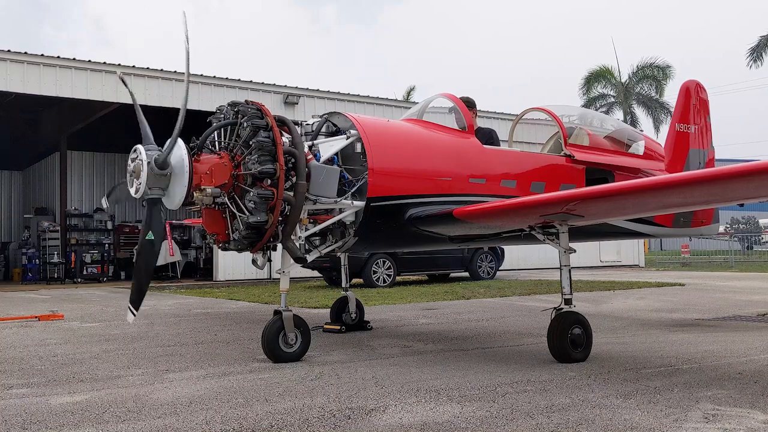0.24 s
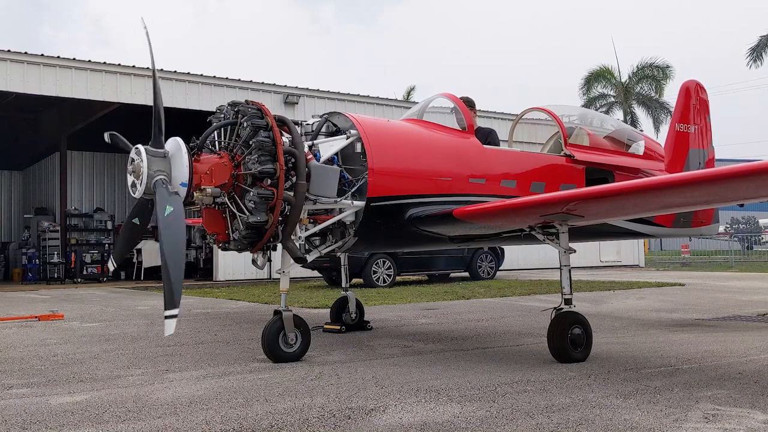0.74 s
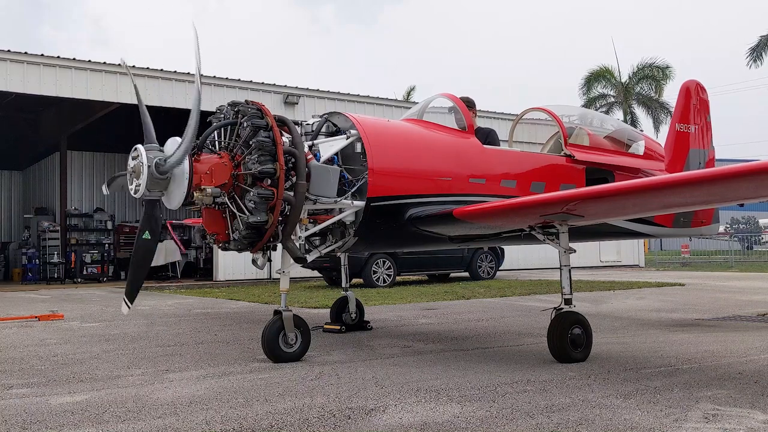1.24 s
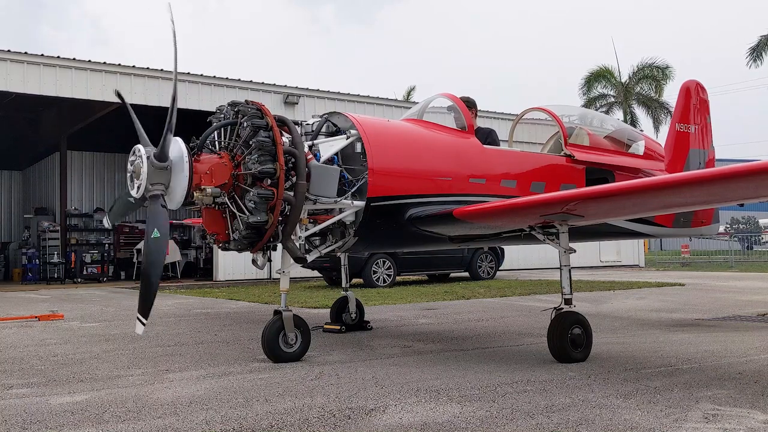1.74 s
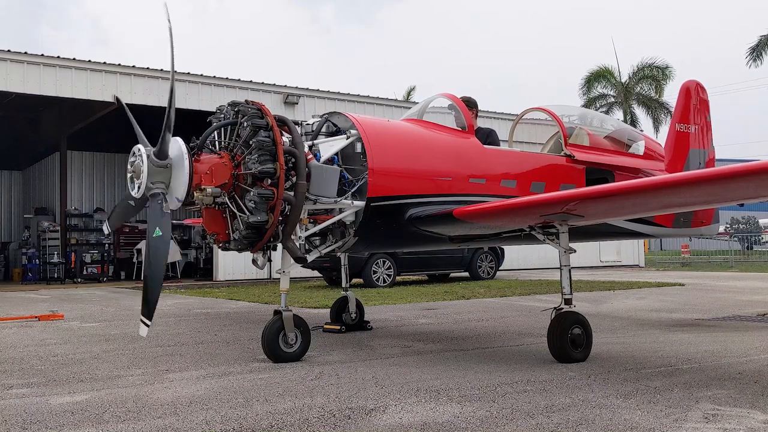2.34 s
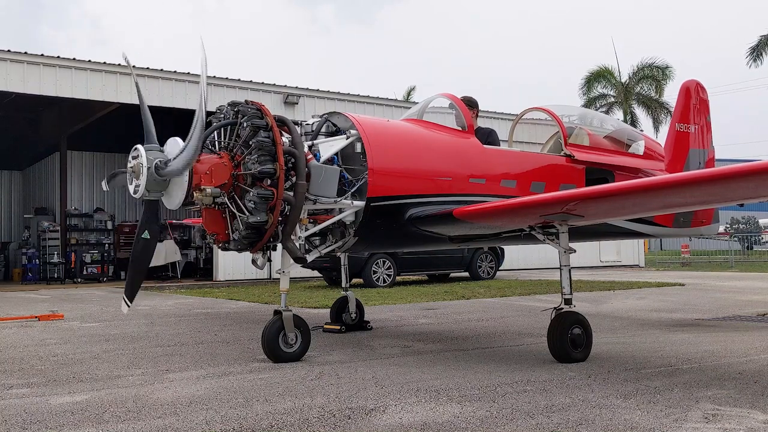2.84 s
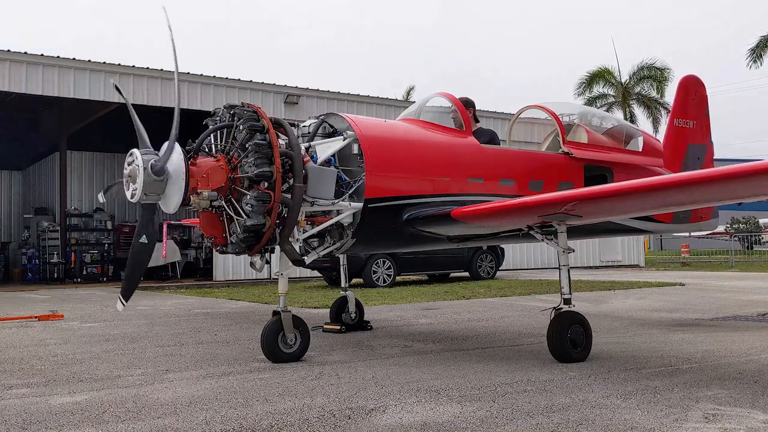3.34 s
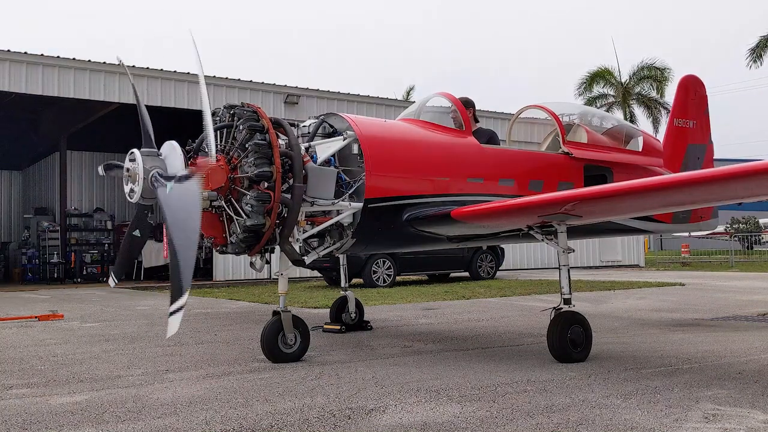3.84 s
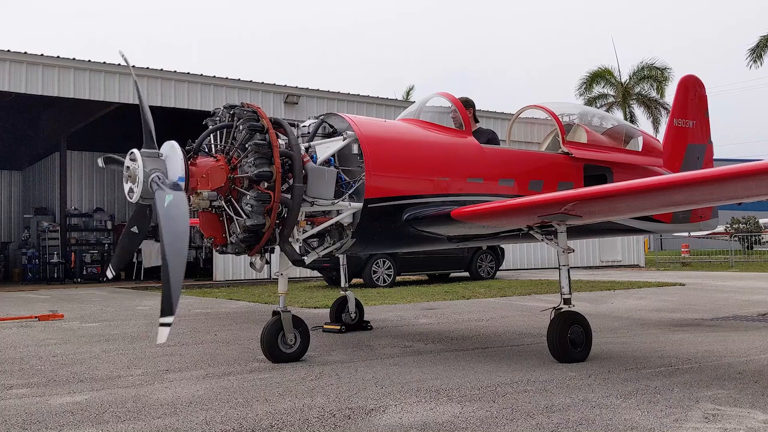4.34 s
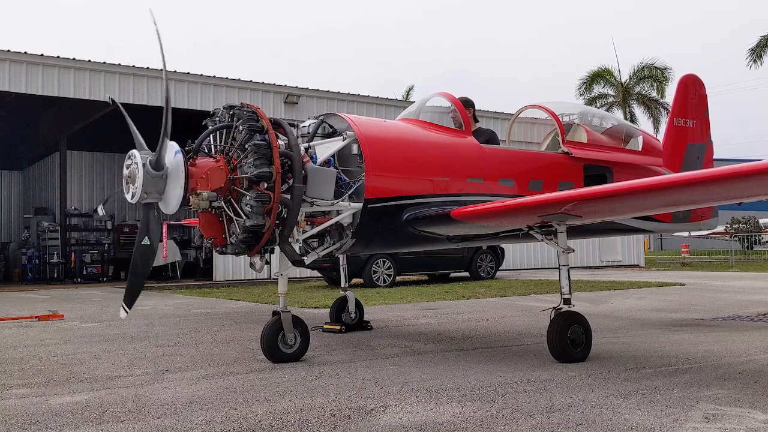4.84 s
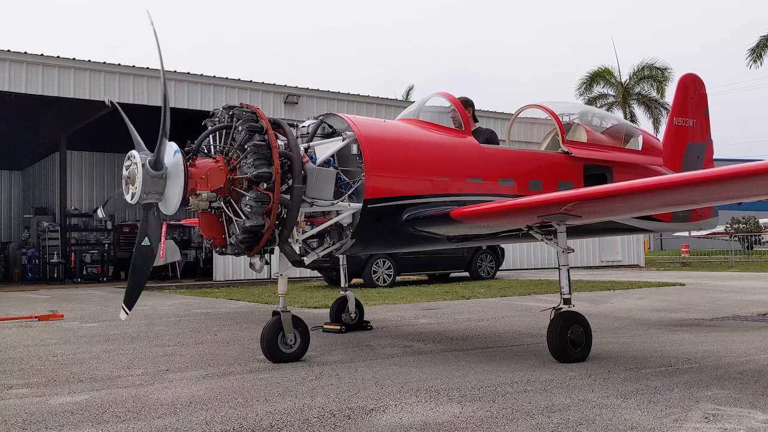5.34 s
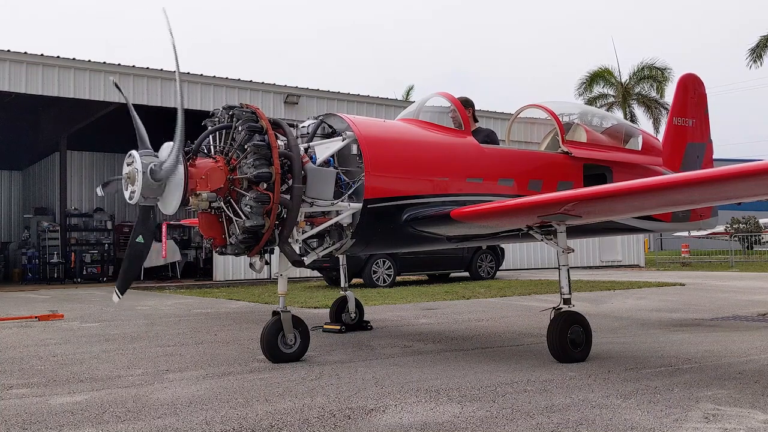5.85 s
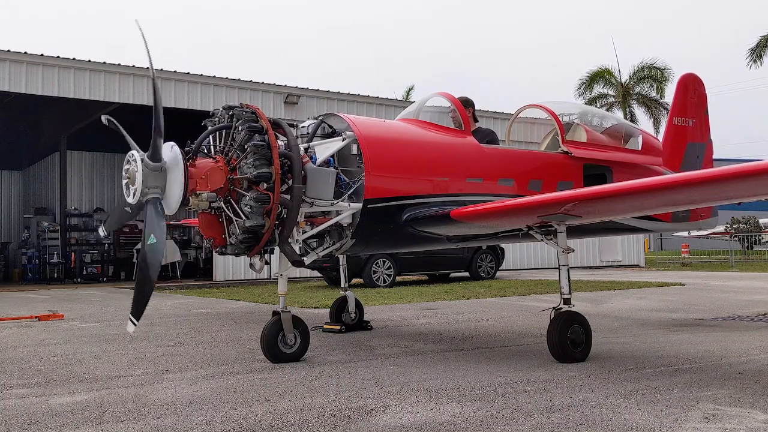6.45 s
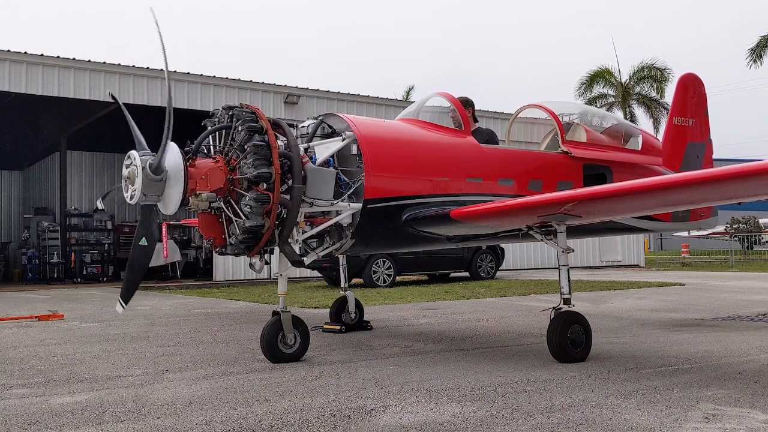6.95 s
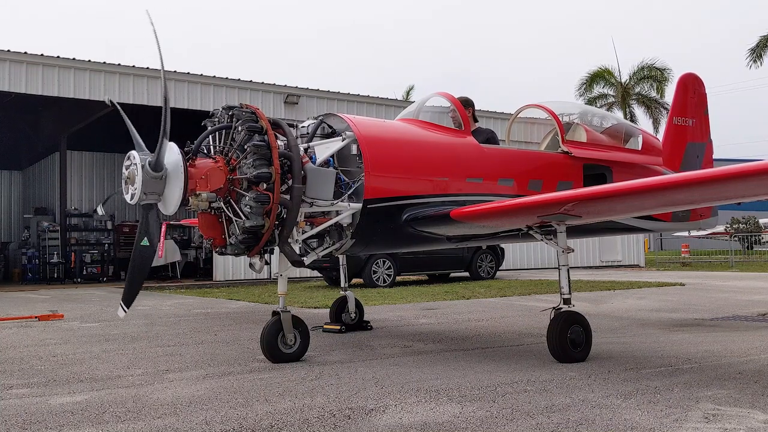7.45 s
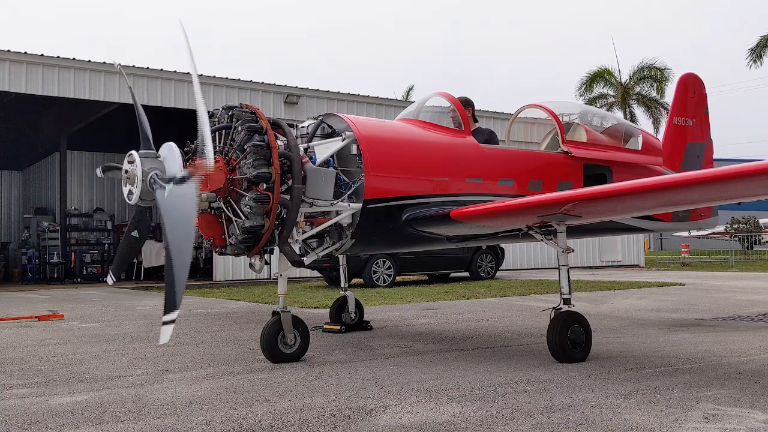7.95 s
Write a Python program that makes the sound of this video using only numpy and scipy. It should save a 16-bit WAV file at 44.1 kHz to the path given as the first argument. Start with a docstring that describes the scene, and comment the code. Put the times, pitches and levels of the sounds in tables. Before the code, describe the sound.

Close outdoor stereo sound of a nine-cylinder aircraft engine. First comes a loping idle, each firing separate and irregular, with low thumps, gulping exhaust, short barks and bright metallic chuffs; some chuffs nearly fail. Faint very high whistles hover above. After three seconds the pulses suddenly fuse into a fast, throbbing drone with broad propeller rush and fine clatter, its speed rising slightly. Three isolated clicks occur later, the last two much louder.

```python
"""An uneven, loping idle is heard first: thumps, gulps and hissing chuffs beneath thin whistles. After three
seconds the scene changes to a steady throbbing run nearly three times as fast, with three brief clicks. The
source is a nine-cylinder radial aircraft engine, uncowled on an open ramp. Puffs with each cylinder's own
timing and strength excite exhaust modes; gated turbulence gives the chuffs and rush; ringing modes give the
gulps, barks and metallic ticks; narrow-band noise gives the whistles; decaying jumps give the clicks."""
import sys
import numpy as np
from scipy import signal
from scipy.fft import rfft, irfft, next_fast_len
from scipy.io import wavfile
from scipy.ndimage import map_coordinates

SR = 44100
rng = np.random.default_rng(int(sys.argv[2]) if len(sys.argv) > 2 else 0)


def inscribe(sig):
    """Save sig as 16-bit PCM at rate SR to the path in sys.argv[1].

    A 1-D sig is mono; a 2-D sig holds one channel per row.
    Samples are clipped to [-1, 1] before scaling.
    """
    pcm = np.round(np.clip(np.atleast_2d(sig).T, -1, 1) * 32767)
    wavfile.write(sys.argv[1], SR, pcm.astype(np.int16))


N = 361179
TIME = np.arange(N) / SR
CHANGE_S = 2.985  # the scene changes from the idle to the run
PICKUP_RPM, SETTLED_RPM = 1545, 1650
CHUFF_SCATTER_DB, MISS_DB = 2, -14
RUN_PUFF_HZ = 263.4  # each puff is too rounded to hold much above this
EARLY_BARK_DB, SETTLED_BARK_DB = -2.5, 0.8  # the barks grow as the engine settles
TOP_HZ = 16000  # upper band limit

# "Place" is the position in ninths of the two-turn engine cycle.
# Crankshaft speed: [t/s, speed/rpm]
IDLE_SPEED = [(0.0, 580.0), (0.5, 584.3), (1.1, 585.8), (1.7, 560.2), (2.0, 583.1), (2.4, 555.5),
              (2.98, 576.0)]
RUN_SPEED = [(3.0, 1533.1), (3.6, 1548.2), (4.3, 1603.5), (4.6, 1598.8), (4.9, 1633.2), (5.3, 1642.4),
             (5.6, 1633.2), (5.9, 1659.8), (6.3, 1655.6), (6.6, 1652.5), (6.9, 1676.1), (8.19, 1712.8)]
# One row per cylinder at idle: [thump place, level/dB, gulp place, level/dB, bark place, level/dB]
IDLE_CYLINDERS = [(1.28, 5, 0.696, -19, 0.099, -24.5), (1.92, -20, 1.93, -24, 0.96, -26.5),
                  (2.8, 5, 2.68, -21.5, 1.77, -27.5), (3.71, 3, 3.4, -20, 2.87, -29.5),
                  (4.87, -5.5, 4.03, -22, 3.56, -30.5), (5.73, 1.8, 5.1, -18.5, 5.3, -27.5),
                  (6.91, 0, 5.8, -17.5, 5.67, -36), (7.77, 2.1, 6.95, -38, 6.58, -30.5),
                  (8.34, -1, 7.63, -18.5, 7.63, -32.5)]
# Pitches of each cylinder's exhaust stub at idle, in firing order: [gulp f/Hz, bark f/Hz]
STUB_PITCHES = [(167, 660), (191, 543), (214, 600), (222, 404), (321, 440), (180.6, 560), (235, 382),
                (345, 640), (189, 580)]
# Exhaust modes: [f/Hz, width/Hz, level/dB]
IDLE_PIPE = [(75.8, 18.7, -28)]
PICKUP_PIPE = [(128.5, 86, -26), (130.4, 23, -27), (228, 27, -40)]
SETTLED_PIPE = [(99, 167, -32), (281.4, 37, -33.5), (432, 75, -27.5)]
# Sharp escapes of gas, one pattern per idle cycle: [place, level/dB]
CHUFF_PATTERN = [(.37, -26.5), (0.872, -26), (1.82, -21), (2.88, -28.5), (3.45, -32.5), (3.872, -21),
                 (4.35, -20.5), (5.45, -31), (5.87, -19.5), (6.85, -25), (7.88, -25.5), (8.35, -30.5)]
# Spells in which the chuffs nearly fail: [start t/s, length/s]
MISSES = [(.355, .055), (.56, .06), (1.59, .07), (2.23, .05)]
# Thumps under power: [pick-up place, level/dB, settled place, level/dB]
RUN_CYLINDERS = [(.98, 3.5, 0.923, 5.5), (2.02, -1.2, 2.01, -12.5), (2.59, 3, 2.48, 3.5),
                 (3.65, 3.9, 3.72, 0), (4.85, 1, 4.85, 5), (5.83, -1.8, 5.86, -5.5), (6.63, -9, 6.46, 0.6),
                 (7.69, -0.3, 7.76, -0.2), (8.65, -3, 8.81, -0.1)]
# Barks under power, one per cylinder: [place, level/dB, f/Hz]
RUN_BARKS = [(.2, -41, 455.8), (.48, -39.5, 410.6), (2.24, -39.5, 354.5), (4.35, -49.7, 488),
             (5.32, -34, 265.4), (5.72, -40.5, 390), (5.92, -44.5, 586), (7.42, -51, 429),
             (8.27, -44.5, 357.5)]
# Gas and propeller rush under power: [t/s, level/dB]
RUSH_LEVEL = [(3, -32.5), (3.8, -32), (4.8, -32), (5.7, -31.5), (6.4, -30.5), (7.4, -29.5), (8.19, -30.5)]
# Drift of the exhaust tone between the sides: [t/s, left minus right level/dB]
EXHAUST_LEAN = [(0, 1.8), (2.6, 1.9), (3.8, 1.8), (4.5, 0.7), (6.5, -0.2), (8.19, 0.5)]
# Two whistles heard together at first, a thin one that soon fades and a breathy one that lasts:
# [t/s, f/Hz, level/dB]
THIN_WHISTLE = [(0, 12430, -40), (.84, 12410, -39), (.89, 12390, -50), (1, 12400, -43), (1.15, 12400, -70)]
BREATHY_WHISTLE = [(0, 11650, -42), (1, 11600, -42), (1.25, 11540, -31.5), (1.6, 11260, -43),
                   (2.2, 11190, -45), (2.96, 11170, -41), (3.05, 11200, -53.5), (6.5, 11230, -58),
                   (7.3, 11250, -41), (8.19, 11200, -39)]
# Click instants: [t/s, peak level/dB]
CLICK_TIMES = [(4.584, -16), (5.5866, -3.5), (6.5864, -2)]
# Noise spectra: [f/Hz, level/dB per Hz]
GULP_SPECTRUM = [(90, -52), (135, -1), (220, -2), (330, -8.5), (450, -16), (900, -70)]
IDLE_BARK_SPECTRUM = [(250, 0.5), (420, -5.5), (580, 0.5), (700, -6.5), (850, -12), (1600, -24)]
RUN_BARK_SPECTRUM = [(300, -28), (450, -4.5), (580, 0), (700, -11.5), (900, -13), (1600, -36)]
RUMBLE_SPECTRUM = [(15, -30), (35, -7), (60, 3), (130, -6), (300, -2), (700, -22), (1400, -49)]
CHUFF_SPECTRUM = [(440, -13), (750, -4), (831, -5), (1440, -4.5), (1600, -6.5), (2230, -2), (3110, -5),
                  (3860, -4.5), (5970, -7), (7050, -7), (9470, -7), (10600, -11.5), (11500, -3),
                  (12900, -9), (16000, -17)]
RUSH_SPECTRUM = [(440, -15), (750, -4), (1300, -2.5), (1860, -6), (2340, -4), (3070, -2.5), (3310, -7),
                 (3810, -5), (6360, -9), (9470, -11), (10500, -12), (11500, -6.5), (13500, -10.5),
                 (15200, -16), (16000, -8.5)]
# Cylinder and pipe resonances that colour the gas noise: [f/Hz, width/Hz, level/dB]
METAL_MODES = [(1340, 130, 2.5), (2270, 190, 2.5), (3850, 77, 5), (4650, 580, 2), (7110, 150, 5),
               (9650, 1340, 4)]
# Modes of the ticking metal: [f/Hz, level/dB]
TICK_MODES = [(1330, -7.5), (2280, 2.5), (2600, -4), (3770, -3.5), (4530, 1.5), (7080, 1.5), (9200, 0.5)]
# Stereo coherence: [f/Hz, left-right correlation]
COHERENCE = [(60, 0.28), (640, 1), (1400, 0.9), (3100, 0.62), (6800, 0.15), (15000, 0.15)]
# Stereo balance: [f/Hz, left minus right level/dB]
BALANCE = [(60, 2), (115, 4.5), (210, 2.3), (380, -2), (700, 0), (1290, 4), (2380, 0), (4400, 2.5),
           (8120, 1.5), (12000, 0), (15000, -6.5)]


def amp(db):
    """Logarithmic level: 20 dB is a tenfold change of amplitude."""
    return np.exp(np.log(10) * np.asarray(db) / 20)


def unit(x):
    """Mean-square normalisation: the result has rms 1."""
    return x / np.sqrt(np.mean(x ** 2) + 1e-20)


def along(points, hz):
    """Logarithmic frequency scale: interpolate (f, value) points."""
    f, v = np.transpose(points)
    return np.interp(np.log(hz + 1), np.log(f + 1), v)


def curves(rows):
    """Linear interpolation in time: one curve for each column after t."""
    t, *columns = np.transpose(rows)
    return [np.interp(TIME, t, c) for c in columns]


def wobble(rate):
    """Band-limited random fluctuation: a smooth curve through rate knots a second."""
    fine = np.arange(0, N * rate / SR + 1, .1)
    knots = rng.standard_normal(int(N * rate / SR) + 4)
    return np.interp(TIME * rate, fine, map_coordinates(knots, [fine]))


def filtered(x, gain):
    """Linear filtering: each frequency is multiplied by its own gain."""
    size = next_fast_len(N + SR // 4)
    return irfft(rfft(x, size) * gain(np.fft.rfftfreq(size, 1 / SR)), size)[..., :N]


def air(spectrum, resonances=(), source=None):
    """Partial coherence: coloured stereo noise of rms 1, its sides mixed from common and opposed parts."""
    pair = rng.standard_normal((2, N), dtype=np.float32)
    if source is not None:
        pair[0] = source
    size = next_fast_len(N, True)
    hz = np.geomspace(5, SR / 2, 1500)
    db = along(spectrum, hz)
    db = db + sum(g / (1 + (2 * (hz - f) / w) ** 2) for f, w, g in resonances)
    # this angle gives the wanted left-right correlation
    angle = np.arccos(np.clip(along(COHERENCE, hz), -1, 1)) / 2
    gains = amp(db) * np.cos(angle), amp(db) * np.sin(angle), amp(along(BALANCE, hz) / 2)
    bins = np.fft.rfftfreq(size, 1 / SR)
    common, apart, lean = (np.interp(bins, hz, g).astype(np.float32) for g in gains)
    mid, side = rfft(pair, size) * [common, apart]
    sides = np.array([(mid + side) * lean, (mid - side) / lean])
    return unit(irfft(sides, size)[:, :N])


def cycles(speed, start_s):
    """Four-stroke cycle: count cycles from start_s; every cylinder fires once in two crank turns."""
    turn = np.cumsum(curves(speed)[0]) / SR / 120  # rpm to cycles per second
    return turn - np.interp(start_s, TIME, turn)


def each_cycle(shape, turn):
    """Periodicity: one shape repeats every engine cycle."""
    return np.interp(turn % 1, np.linspace(0, 1, len(shape) + 1), np.append(shape, shape[0]))


def resonance(hz, centre_hz, width_hz):
    """Damped resonance: complex response of one pipe mode, 1 at its centre."""
    return 1j * hz * width_hz / (centre_hz ** 2 - hz ** 2 + 1j * hz * width_hz)


def pipe(resonances, puff_hz, cut_hz):
    """Modal superposition: modes of alternating sign, driven by a rounded puff; little radiates below cut_hz."""
    def response(hz):
        modes = sum((-1) ** k * amp(db) * resonance(hz, f, w) for k, (f, w, db) in enumerate(resonances))
        rounding = np.exp(-(hz / puff_hz) ** 2)
        radiation = 1 - np.exp(-(hz / cut_hz) ** 4)
        return modes * rounding * radiation
    return response


def exhaust_tone(turn, cylinders, response, rpm):
    """Fourier series: nine uneven puffs a cycle set the strength of each harmonic of the exhaust."""
    place, db = cylinders.T
    order = np.arange(100)[:, None]
    puffs = amp(db) * np.exp(-2j * np.pi * order * place / len(place))
    # the response is evaluated at one representative speed
    harmonics = np.sum(puffs * response(order * rpm / 120), axis=1)
    return each_cycle(irfft(harmonics, 2048) * 1024, turn)


def placed(tone):
    """Interaural level difference: the bass of the exhaust lies to the left."""
    sides = [.5, -.5]
    drifting = tone * amp(np.outer(sides, curves(EXHAUST_LEAN)[0]))
    return filtered(drifting, lambda hz: amp(np.outer(sides, along(BALANCE, hz))))


def stub_rings(turn, cylinders, pitches, t60_s, detune, scatter_db):
    """Free decay: each firing sets its own exhaust stub ringing briefly, to the end of the idle."""
    place, db = cylinders.T
    t = np.arange(SR // 12) / SR
    fade = amp(-60 * t / t60_s) * (1 - np.exp(-t / .001))
    out = np.zeros(N + len(t))
    for cycle in range(int(np.interp(CHANGE_S, TIME, turn)) + 1):
        firing_s = np.interp(cycle + place / len(place), turn, TIME)
        for s, level, hz in zip(firing_s, db, pitches):
            size = amp(level + scatter_db * rng.normal())
            pitch = hz * np.exp(detune * rng.normal())
            out[round(s * SR):][:len(t)] += size * fade * np.sin(2 * np.pi * pitch * t)
    return out[:N]


def bursts(times, db, rise_s, fall_s):
    """Addition of incoherent powers: envelope of gas bursts that swell and die exponentially."""
    t = np.arange(-(SR // 8), SR // 8 + 1) / SR
    shape = np.exp(-np.abs(t) / np.where(t < 0, rise_s, fall_s))  # of power
    places = np.clip(times * SR, 0, N).astype(int)
    peaks = np.bincount(places, amp(db) ** 2, N + 1)[:N]
    peaks[0] = 0  # drops bursts from before the start
    return np.sqrt(np.abs(signal.oaconvolve(peaks, shape, "same")))


def blowdown(turn, cylinders, spectrum, repeat, rise_s, fall_s, scatter_db):
    """Turbulent discharge: each opening valve lets out a noise burst, partly the same every cycle."""
    place, db = cylinders.T
    firing = np.arange(np.floor(turn[0]), turn[-1])[:, None] + place / len(place)
    sizes = db + scatter_db * rng.standard_normal(firing.shape)
    gate = bursts(np.interp(firing.ravel(), turn, TIME), sizes.ravel(), rise_s, fall_s)
    habit = unit(each_cycle(rng.standard_normal(int(N / (turn[-1] - turn[0]))), turn))
    share = np.clip(repeat, 0, 1)  # repeated part of the common source's power
    source = np.sqrt(share) * habit + np.sqrt(1 - share) * rng.standard_normal(N)
    return gate * air(spectrum, source=source)


def chuffs(turn):
    """Cyclic gas release: times and levels of one pattern a cycle, a little uneven, with a few misses."""
    place, db = np.transpose(CHUFF_PATTERN)
    firing = np.arange(np.interp(CHANGE_S, TIME, turn))[:, None] + place / len(IDLE_CYLINDERS)
    times = np.interp(firing, turn, TIME)
    missed = sum((times > s) & (times < s + length) for s, length in MISSES)
    levels = db + CHUFF_SCATTER_DB * rng.standard_normal(firing.shape) + MISS_DB * missed
    return times.ravel(), levels.ravel()


def ticks(times, db, t60_s, detune, scatter_db):
    """Impact excitation: each contact of valve gear or pipes rings metal modes at new pitches and strengths."""
    t = np.arange(SR // 40) / SR
    hz, mode_db = np.transpose(TICK_MODES)
    fade = amp(-60 * t / t60_s) * (1 - np.exp(-t / .0004))
    out = np.zeros((2, N + len(t)))
    for s, level in zip(times, db):
        pitch = hz * np.exp(detune * rng.standard_normal(len(hz)))
        size = amp(level + mode_db + scatter_db * rng.uniform(-1.35, 1, len(hz)))
        ear_phase = rng.standard_normal((2, len(hz), 1))
        modes = np.sin((ear_phase + 2 * np.pi * np.outer(pitch, t)).astype(np.float32))
        start = round(max(s, 0) * SR)
        out[:, start:start + len(t)] += size @ modes * fade
    return out[:, :N]


def idle():
    """Separable pulses: at low speed thumps, hollow gulps and barks, and metallic chuffs stand apart."""
    turn = cycles(IDLE_SPEED, 0)
    thumps, gulps, barks = np.split(np.array(IDLE_CYLINDERS), 3, axis=1)
    gulp_hz, bark_hz = np.transpose(STUB_PITCHES)
    rpm = np.mean(IDLE_SPEED, axis=0)[1]
    unsteady = turn + 0.0019 * wobble(25.04)
    tone = exhaust_tone(unsteady, thumps, pipe(IDLE_PIPE, puff_hz=130.5, cut_hz=53), rpm)
    tone = tone * amp(-0.1 + 0.5 * wobble(32.4))
    # gulps and barks are part pipe ring, part turbulence
    gulp = amp(2.5) * stub_rings(turn, gulps, gulp_hz, t60_s=0.068, detune=0.061, scatter_db=1)
    gulp = gulp + amp(-4) * blowdown(turn, gulps, GULP_SPECTRUM, repeat=0.19,
                                     rise_s=0.0032, fall_s=0.014, scatter_db=0.5)
    bark = amp(2.5) * stub_rings(turn, barks, bark_hz, t60_s=0.071, detune=0.072, scatter_db=1.5)
    bark = bark + blowdown(turn, barks, IDLE_BARK_SPECTRUM, repeat=0.22,
                           rise_s=0.0021, fall_s=0.016, scatter_db=0.5)
    times, chuff_db = chuffs(turn)
    # a faint steady hiss lies beneath the chuffs
    gas = np.hypot(bursts(times, chuff_db, rise_s=0.0027, fall_s=0.006), amp(-31))
    hiss = gas * amp(1.32 * wobble(500)) * air(CHUFF_SPECTRUM, METAL_MODES)
    clatter = amp(-3.5) * ticks(times, chuff_db, t60_s=.026, detune=.08, scatter_db=6)
    rumble = amp(-41.5) * air(RUMBLE_SPECTRUM)
    return placed(tone) + gulp + bark + hiss + clatter + rumble


def whistle(rows, width_hz):
    """Narrow-band noise: random quadrature modulation of a drifting pitch, different in each ear."""
    hz, db = curves(rows)
    phase = 2 * np.pi * np.cumsum(hz) / SR
    ears = np.array([wobble(width_hz) * np.cos(phase) + wobble(width_hz) * np.sin(phase) for _ in range(2)])
    return amp(db) * unit(ears) * amp([[-2.5], [2.5]])  # stronger on the right


def running():
    """Pulse fusion: at speed the thumps merge into a drone, with growl, pulsing rush and valve clatter."""
    turn = cycles(RUN_SPEED, 3)
    early, thumps = np.split(np.array(RUN_CYLINDERS), 2, axis=1)
    bark_table = np.array(RUN_BARKS)
    barks, bark_hz = bark_table[:, :2], bark_table[:, 2]
    unsteady = turn + .0009 * wobble(70)
    # the drone booms while the engine picks up speed, then deepens as it settles
    settled = np.interp(curves(RUN_SPEED)[0], [PICKUP_RPM, SETTLED_RPM], [0, 1])
    boom = exhaust_tone(unsteady, early, pipe(PICKUP_PIPE, RUN_PUFF_HZ, cut_hz=36), PICKUP_RPM)
    drone = exhaust_tone(unsteady, thumps, pipe(SETTLED_PIPE, RUN_PUFF_HZ, cut_hz=56), SETTLED_RPM)
    purr = exhaust_tone(unsteady, barks, lambda hz: resonance(hz, bark_hz, width_hz=52) ** 2, SETTLED_RPM)
    purr = purr * amp((1 - settled) * EARLY_BARK_DB + settled * SETTLED_BARK_DB)
    tone = (1 - settled) * boom + settled * drone + purr
    tone = tone * amp(-0.2 + 0.65 * wobble(90))
    # the growl trails the thumps slightly
    growl = amp(-38.5) * blowdown(turn - .03, thumps, RUN_BARK_SPECTRUM, repeat=0.11,
                                  rise_s=0.0024, fall_s=0.0054, scatter_db=1.1)
    # the rush swells with the strong firings
    rush_db, = curves(RUSH_LEVEL)
    puffs = blowdown(turn, thumps, RUSH_SPECTRUM, repeat=.2, rise_s=0.0007, fall_s=0.0042, scatter_db=4.5)
    rush = amp(4.5 + 1.45 * wobble(400)) * air(RUSH_SPECTRUM, METAL_MODES) + amp(-6.0) * puffs
    # a valve shuts once for each firing, some much harder than others
    shuts = np.interp(np.arange(0, turn[-1], 1 / len(barks)), turn, TIME)
    clatter = ticks(shuts, rng.normal(-39, 2.5, len(shuts)), t60_s=.04, detune=.07, scatter_db=5)
    rumble = amp(-30.0) * air(RUMBLE_SPECTRUM)
    return placed(tone) + growl + amp(rush_db) * rush + clatter + rumble


def clicks():
    """Exponential decay: each click is a sudden negative jump that dies away at once."""
    jumps = np.zeros(N)
    for s, db in CLICK_TIMES:
        jumps[round(s * SR)] = -amp(db)
    decay_s = 0.00051
    return signal.lfilter([1], [1, -np.exp(-1 / (decay_s * SR))], jumps)


def scene():
    """Superposition: the scene changes abruptly from the idle to the run, with whistles and clicks added."""
    fast = np.clip((TIME - CHANGE_S) / .01 + .5, 0, 1)
    engine = np.sqrt(1 - fast) * idle() + np.sqrt(fast) * running()  # equal-power change
    whistles = whistle(THIN_WHISTLE, width_hz=27.8) + whistle(BREATHY_WHISTLE, width_hz=170)
    return engine + whistles + clicks()


def record(dry):
    """Propagation delay: sound reaches the right side slightly late; nothing passes above the band limit."""
    late_s = 3e-5
    return filtered(dry, lambda hz: (hz < TOP_HZ) * np.exp(-2j * np.pi * np.outer([0, late_s], hz)))


dry = scene()
out = record(dry)
inscribe(out)
```